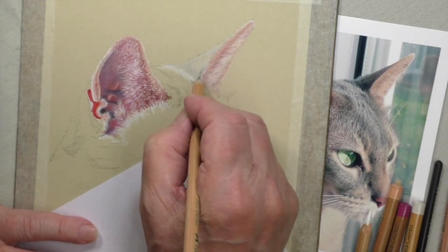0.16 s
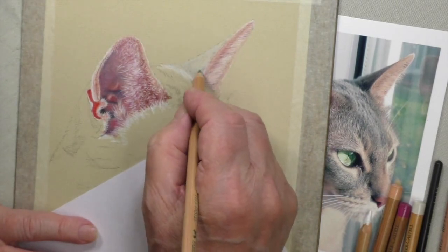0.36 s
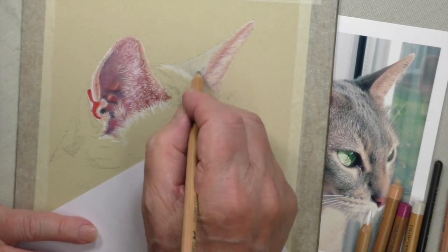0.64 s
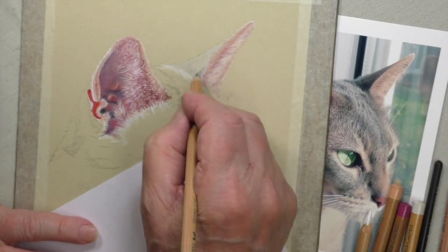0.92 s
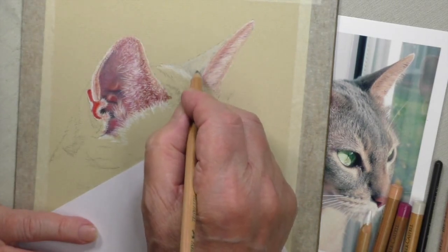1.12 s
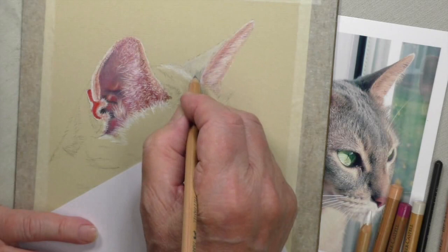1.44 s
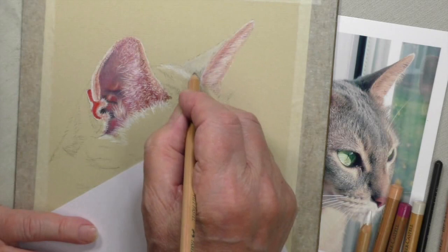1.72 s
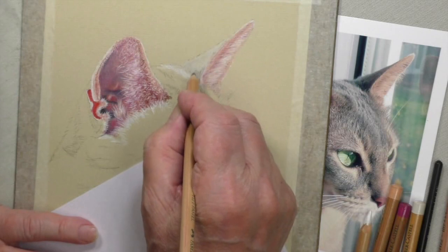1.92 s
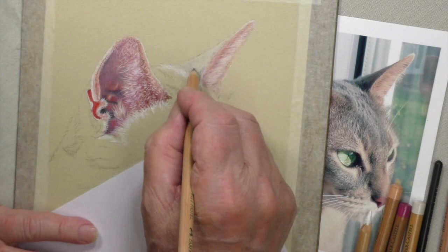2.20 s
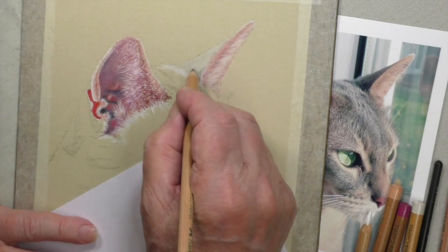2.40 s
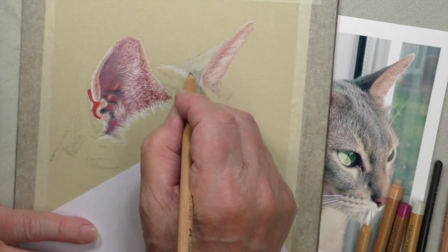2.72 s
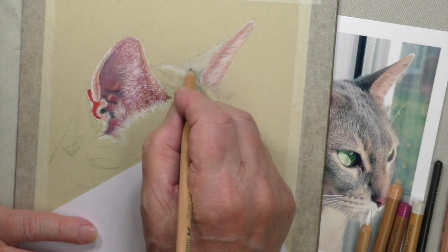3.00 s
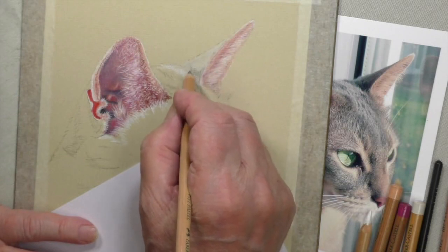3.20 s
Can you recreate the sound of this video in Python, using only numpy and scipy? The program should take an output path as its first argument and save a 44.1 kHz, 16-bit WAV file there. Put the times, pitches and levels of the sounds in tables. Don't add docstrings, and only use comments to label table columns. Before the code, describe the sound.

A pastel pencil hatches rough paper in short separate strokes, about four a second; early ones land with sharp knocks, later ones drag with a fuller, duller board rub. Close stereo microphone, quiet small studio, faint hum.

```python
import sys
import numpy as np
from scipy import signal
from scipy.fft import rfft, irfft, next_fast_len
from scipy.io import wavfile
from scipy.ndimage import uniform_filter1d, map_coordinates

SR = 44100
rng = np.random.default_rng(int(sys.argv[2]) if len(sys.argv) > 2 else 0)


def int16_out(signal):
    q = np.round(np.clip(np.atleast_2d(signal).T, -1, 1) * 32767)
    wavfile.write(sys.argv[1], SR, q.astype(np.int16))


def ratio_of_db(decibels):
    return 10 ** (np.asarray(decibels, float) / 20)


N = 147735

# start [t/s], length [t/s], grit [level/dB], board [level/dB],
# lean [under 1: fast early, over 1: fast late]
STROKES = [(-.06, 0.097, -24.5, -29, 0.56), (.192, 0.11, -26.5, -33.5, 0.91),
           (0.46, 0.098, -26.5, -33, 1.04), (0.726, 0.11, -27, -34, 0.92), (.982, 0.097, -27, -31.5, 0.57),
           (1.205, 0.097, -27.5, -32, 1.04), (1.447, 0.088, -28, -35, 0.95), (1.556, 0.099, -26, -24, 1.3),
           (1.777, 0.1, -28.5, -24, 1.15), (1.9851, 0.097, -28.5, -23.5, 0.95),
           (2.184, 0.11, -29.5, -24, 0.98), (2.401, 0.083, -35.5, -27.5, 1.14),
           (2.593, 0.11, -32, -26.5, 1.34), (2.817, .12, -29.5, -23.5, 1.21),
           (3.04, 0.12, -30.5, -24, 1.18), (3.272, 0.14, -29, -23, 1.01)]
# centre [f/Hz], width [f/Hz], strength [level/dB]
BOARD_TONES = [(455.6, 158, -8.5), (578, 82.5, -4), (647.8, 44.7, 1.5), (786, 64, -1.5), (868, 58.5, -3),
               (929, 32.2, -3.5), (1017, 16.7, -2), (1241, 85, -9.5), (1324, 58, -7), (1771, 73, -7.5),
               (2156, 240, -2.5), (2117, 200, -3), (2680, 67, -17), (3360, 67, -33)]
GRIT_ROUND, GRIT_SKEW = 0.96, 1


def unit(x):
    return x / np.sqrt(np.mean(x ** 2) + 1e-20)


def along(points, hz):
    f, v = np.transpose(points)
    return np.interp(np.log(hz + 1), np.log(f + 1), v)


def wobble(rate):
    knots = rng.standard_normal(int(N * rate / SR) + 4)
    return map_coordinates(knots, [np.arange(N) * rate / SR])


def filtered(x, response):
    m = next_fast_len(N + SR // 2)
    return irfft(rfft(x, m) * response(np.fft.rfftfreq(m, 1 / SR)), m)[..., :N]


def resonant(peaks):
    def response(f):
        total = 0
        for k, (centre, width, db) in enumerate(peaks):
            loss = 1j * f * max(width, 40)
            total = total + (-1) ** k * ratio_of_db(db) * loss / (centre * centre - f * f + loss)
        return total
    return response


def spread(pair, alike):
    def mid_and_side(hz):
        turn = np.arccos(np.clip(along(alike, hz), -1, 1)) / 2
        return np.array([np.cos(turn), np.sin(turn)])
    mid, side = filtered(pair, mid_and_side)
    return np.array([mid + side, mid - side])


def shaped_noise(points):
    return unit(filtered(rng.standard_normal((2, N)), lambda hz: ratio_of_db(along(points, hz))))


def studio():
    # f/Hz, level/dB per Hz
    air_colour = [(230, 0.5), (330, 1.5), (500, -0.5), (1000, -2.5), (2200, -8), (9000, -8.5),
                  (14700, -17.5), (15600, -17)]
    # f/Hz, likeness
    air_alike = [(300, 0.45), (1500, 0.27), (5000, 0.067), (15000, 0.072)]
    # f/Hz, level/dB per Hz
    rumble_colour = [(25, -18), (45, -12), (70, -12.5), (130, -2), (220, -8), (290, -35), (400, -58)]
    # f/Hz, rms level/dB, unsteadiness/dB
    hum_tones = [(53.6, -51.5, 3.5), (108, -53.5, 4), (173.8, -52.5, 1)]
    air = ratio_of_db(-53 + .6 * wobble(7.32)) * spread(shaped_noise(air_colour), air_alike)
    low = ratio_of_db(-52 + .8 * wobble(4.7)) * spread(shaped_noise(rumble_colour), [(50, .995), (300, 0.88)])
    t, hum = np.arange(N) / SR, 0
    for hz, db, sway_db in hum_tones:
        loudness = np.sqrt(2) * ratio_of_db(db + sway_db * wobble(7))
        hum = hum + loudness * np.sin(2 * np.pi * hz * t + 0.19 * sway_db * wobble(9))
    fade_db = -2 * np.clip((t - 3.3) / 0.26, 0, 1)
    return air + low + hum * ratio_of_db(fade_db)


def room(x):
    # f/Hz, t/s
    fade_times = [(300, 0.077), (1000, 0.18), (2500, 0.17), (5000, 0.12), (12000, 0.12)]
    out, step = np.zeros((2, N + SR)), SR // 3
    for i in range(0, N, step):
        hz, t, z = signal.stft(rng.standard_normal((2, SR // 3)), SR, nperseg=256)
        fade = ratio_of_db(-60 * t / along(fade_times, hz)[:, None])
        tail = signal.istft(z * fade, SR, nperseg=256)[1]
        wet = signal.fftconvolve(x[:, i:i + step], tail / np.linalg.norm(tail[0]), axes=1)
        out[:, i + 250:][:, :wet.shape[1]] += wet
    return out[:, :N]


def grains(per_s, spread_db):
    u, size = rng.random((2, 2, N)), rng.standard_normal((2, N)).clip(-2, 2)
    return (u[0] < per_s / SR) * np.sign(u[1] - .5) * ratio_of_db(spread_db * size)


def patchy(x, depth_db):
    z = signal.stft(x, nperseg=256)[2]
    field = uniform_filter1d(rng.standard_normal(z.shape), size=3, axis=1)
    field = uniform_filter1d(field, size=12, axis=2)
    return signal.istft(z * ratio_of_db(depth_db * unit(field)), nperseg=256)[1][:, :N]


def arches(level_db, power, share, bite=0):
    bite_s = .002
    t, out = np.arange(N) / SR, 0
    for (start, length, *_, lean), db in zip(STROKES, level_db):
        u = np.clip((t - start) / length, 0, 1)
        arch = np.sin(np.pi * u ** (share * lean)).clip(0) ** power
        sudden = bite * np.clip(u * length / bite_s, 0, 1) * (u < .5)
        out = out + ratio_of_db(db) * np.maximum(arch, sudden) * (u > 0) * (u < 1)
    return out


def hand_thump(push):
    low = filtered(rng.standard_normal((2, N)), lambda f: resonant([(130, 120, 0)])(f) ** 2)
    return ratio_of_db(-20) * uniform_filter1d(push, size=900) * unit(low)


def board_drag(push):
    edge_hz, slow_top_hz = 335, 1320
    raw = grains(per_s=2500, spread_db=6.5)
    dull = signal.sosfilt(signal.butter(2, slow_top_hz, fs=SR, output='sos'), raw)
    speed = arches([r[3] for r in STROKES], 0.92, GRIT_SKEW)
    drive = dull * push + (raw - dull) * speed
    ring = resonant(BOARD_TONES)

    def edge(f):
        return -f * f / (edge_hz ** 2 - f * f + 1.1j * f * edge_hz)
    return filtered(drive, lambda f: ring(f) * edge(f) ** 2) / np.std(filtered(raw, ring))


def tip_taps():
    # t/s, peak level/dB, contact time/ms
    landings = [(.035, -15, 1.04), (0.181, -6, 1.1), (0.4478, -6, 1.21), (.706, -4.5, 1.45),
                (0.9686, -0.5, 1.15), (1.192, -1.5, 1.38), (1.396, -23, 1.4), (1.401, -8.5, 1.7),
                (1.751, -6, 1.72), (1.777, -10, 1.9), (1.958, -3.5, 1.54), (1.987, -6.5, 1.6),
                (2.169, -11.5, 1.98), (2.598, -14.5, 1.6), (2.792, -26.5, 1.54), (2.821, -13, 1.6),
                (3.02, -22, 1.74), (3.23, -25, 1.34)]
    # f/Hz, width/Hz, level/dB
    thud_tones = [(372, 83, -5.5), (799, 298, 5), (1166, 425, 7)]
    trim_db, ring_db, crack_db = -6.5, -2, -15
    t, blows = np.arange(N) / SR, np.zeros(N)
    for start, db, ms in landings:
        for late_s, loss_db in [(0, 0), (0.0044, -8.5), (.012, -13)]:
            u = np.clip((t - start - late_s) / (ms / 1000), 0, 1)
            blows += ratio_of_db(db + loss_db + trim_db) * np.sin(np.pi * u) ** 2
    thud, ring = resonant(thud_tones), resonant(BOARD_TONES)
    taps = filtered(blows, lambda f: thud(f) + ratio_of_db(ring_db) * ring(f))
    tick = np.diff(blows, 2, prepend=[0, 0]) * rng.standard_normal(N)
    crack = ratio_of_db(crack_db) * filtered(tick, resonant([(3500, 3000, 0)]))
    crack = crack * np.abs(taps).max() / np.abs(tick).max()
    return (taps + crack) * [[1], [.7]]


def board():
    push = arches([r[3] for r in STROKES], power=0.84, share=0.54, bite=.65)
    push = push * ratio_of_db(.9 * wobble(70))
    return board_drag(push) + hand_thump(push) + tip_taps()


def grit():
    # f/Hz, width/Hz, level/dB
    tip_tones = [(960, 180, -7.5), (1842, 180, 1.5), (2610, 1500, -11), (3570, 146, -3), (4153, 330, -7.5),
                 (4820, 240, -5), (5474, 340, -5), (6155, 330, -4.5), (8016, 775, 0.5), (8980, 1200, -3.5),
                 (10800, 1860, -5), (13200, 300, -21), (13560, 430, -4.5)]
    dull_hz, dull_per_db = 11500, 0.24
    raw = patchy(grains(per_s=9000, spread_db=1.5), depth_db=3.2)
    sway = ratio_of_db(wobble(44.92))
    top = filtered(raw, lambda f: 1 / (1 + (dull_hz / (f + 1)) ** 12))
    body_db = [r[2] for r in STROKES]
    top_db = [r[2] - dull_per_db * (r[3] - r[2]) for r in STROKES]
    body = (raw - top) * arches(body_db, GRIT_ROUND, GRIT_SKEW)
    fizz = top * arches(top_db, GRIT_ROUND, GRIT_SKEW)
    colour = resonant(tip_tones)
    return filtered((body + fizz) * sway, colour) / np.std(filtered(raw, colour))


def scene():
    # f/Hz, likeness
    pencil_alike = [(300, 1), (1500, 0.92), (2000, 1), (4400, 0.81), (4900, 0.15), (15000, 0.18)]
    fine, coarse = grit(), board()
    a, b = fine + coarse + room(ratio_of_db(-11.5) * fine + ratio_of_db(-8.5) * coarse)
    share, turn_hz = .6, 2300
    turned = filtered(a, lambda f: np.exp(-2j * np.pi * f / turn_hz))
    b = share * turned + np.sqrt(1 - share ** 2) * b
    dip_hz, dip_width_hz, dip_depth = 3830, 600, .93

    def dip(f):
        loss = 1j * f * dip_width_hz
        return 1 - dip_depth * loss / (dip_hz ** 2 - f * f + loss)
    pencil = filtered(spread(np.array([a, b]), pencil_alike), lambda f: dip(f) ** 2)
    return pencil * ratio_of_db([[.2], [-.2]]) + studio()


def roll_off(x):
    return signal.sosfilt(signal.butter(12, 16090, fs=SR, output="sos"), x)


def record(dry):
    top_hz, roll_hz = 15650, 14850
    mix = filtered(dry, lambda hz: (hz < top_hz) * ratio_of_db(-.05 * (hz - roll_hz).clip(0)))
    return roll_off(mix)


dry = scene()
out = record(dry)
int16_out(out)
```